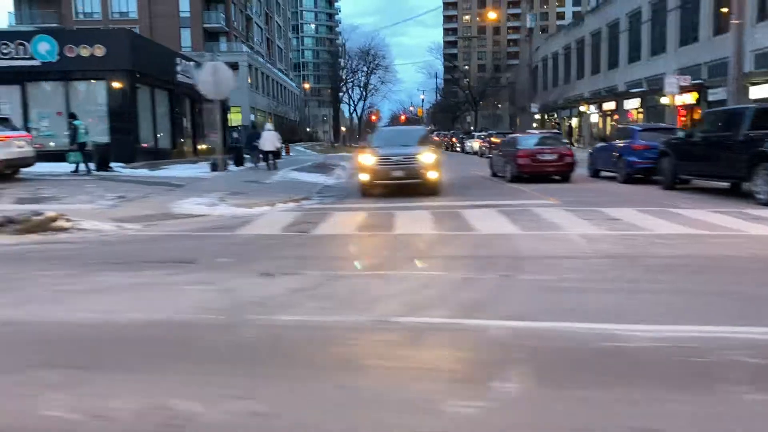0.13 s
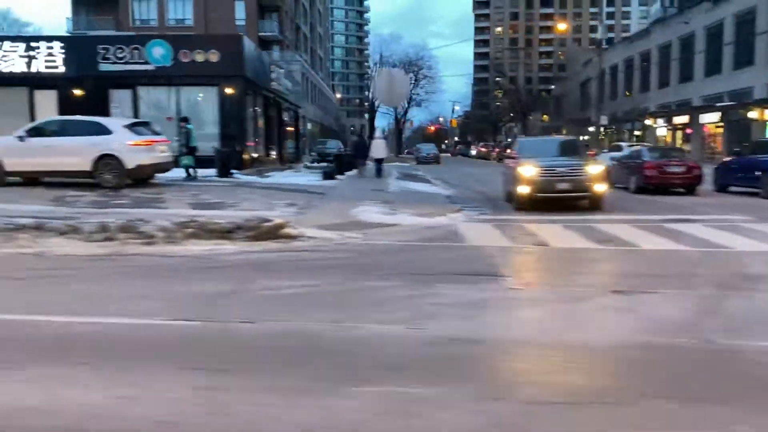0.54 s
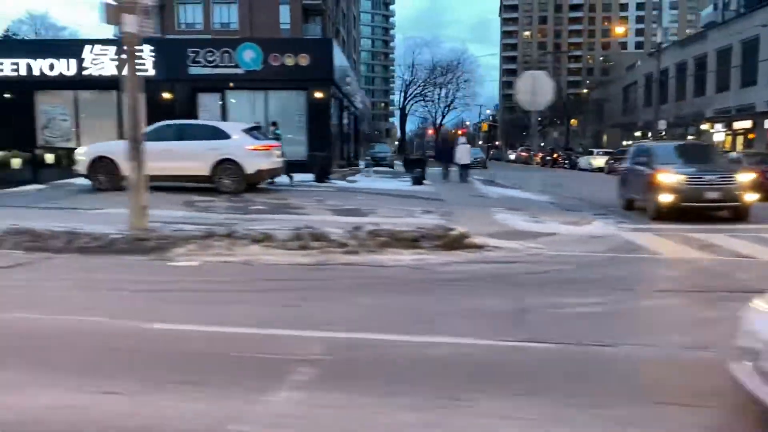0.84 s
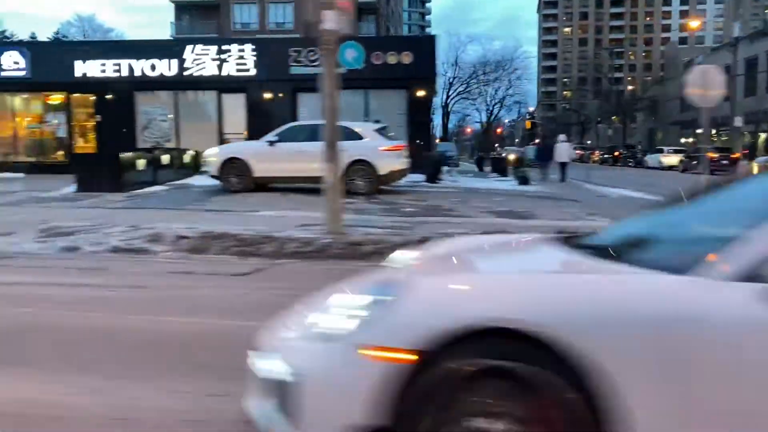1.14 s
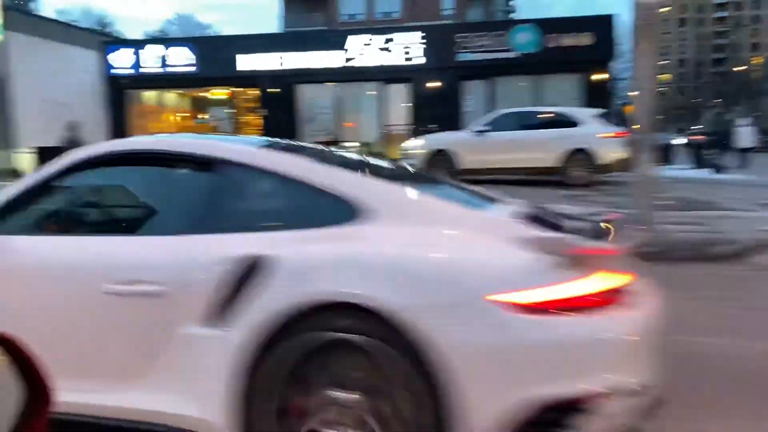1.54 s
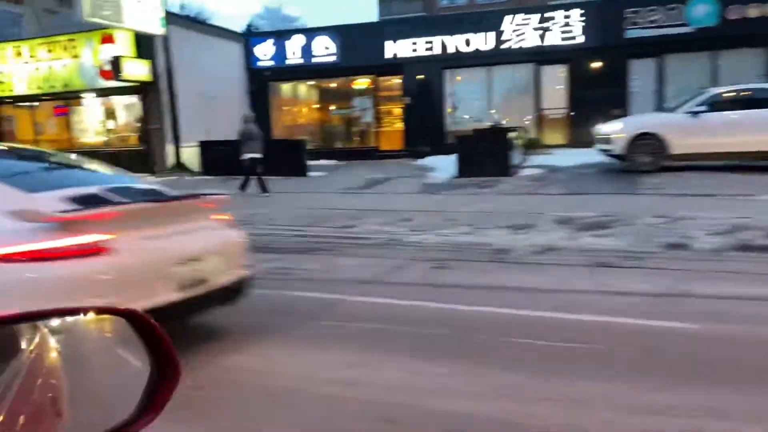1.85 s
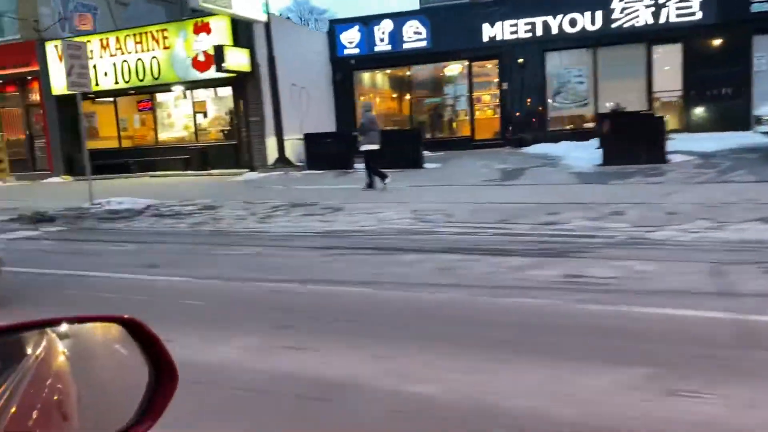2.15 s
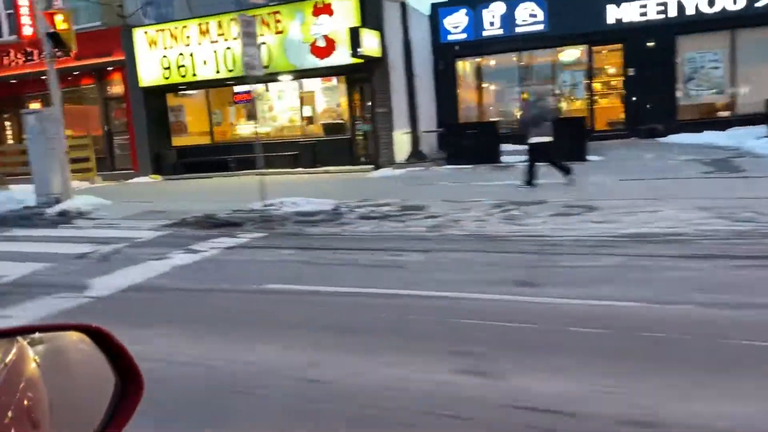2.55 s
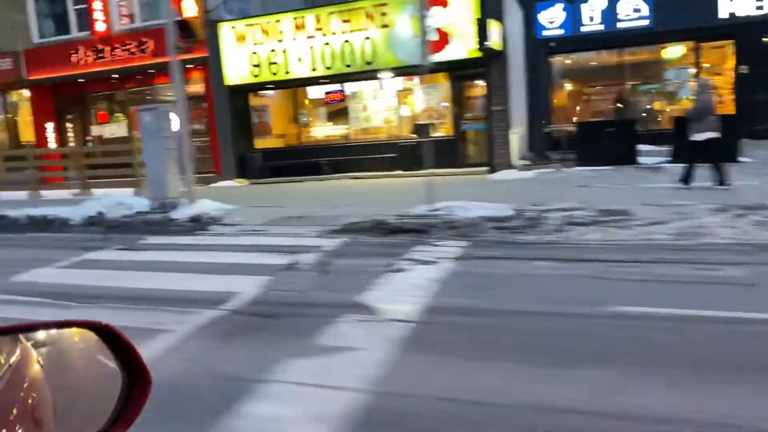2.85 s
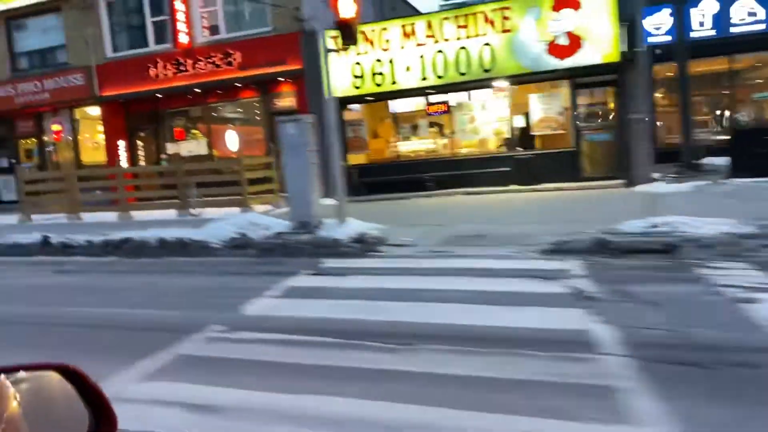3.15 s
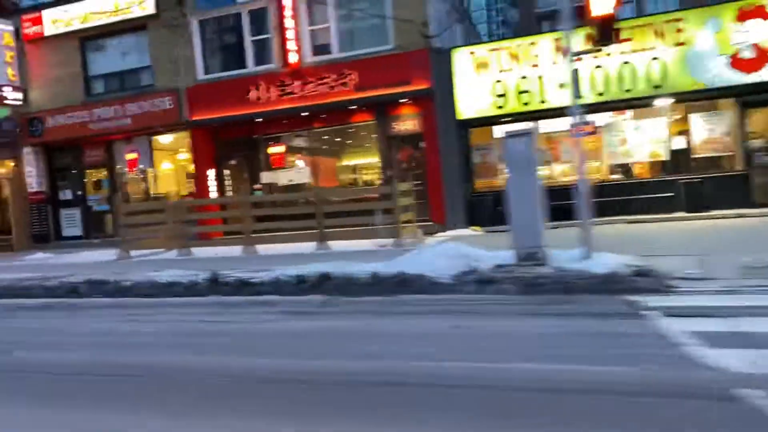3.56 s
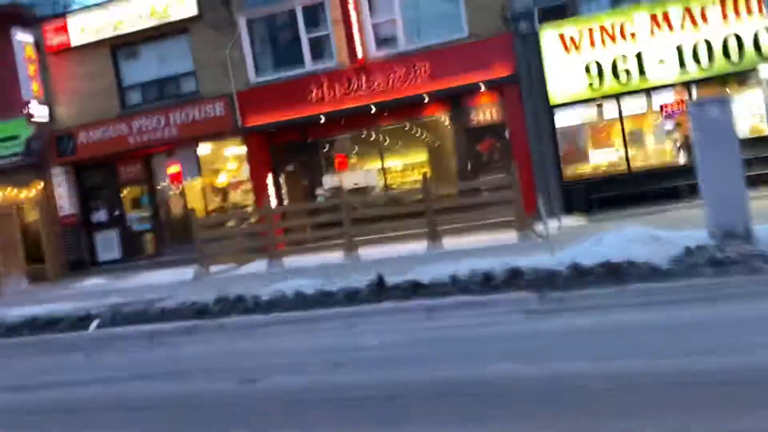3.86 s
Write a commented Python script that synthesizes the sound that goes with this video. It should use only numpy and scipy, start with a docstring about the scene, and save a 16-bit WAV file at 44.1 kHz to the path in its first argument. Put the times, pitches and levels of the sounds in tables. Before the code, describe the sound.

A turbocharged sports car engine, close and slightly left, starts abruptly at 0.07 s and climbs in a loud, raspy drone, with cracks near 0.2 and 0.75 s and growing intake hiss. At 1.45 s the throttle shuts and revs drop quickly. A very high, airy turbo whistle flutters downward in rapid chirps until about 3.6 s, over venting hiss, burbles until 2.4 s, quiet road rumble and dull knocks at 1.6 and 3.9 s.

```python
"""The exhaust of a turbocharged six-cylinder sports car, close by, drones in harmonics of the firing rate.
Noise pulsed by the firings adds rasp and intake hiss as the car pulls; then the throttle shuts and revs drop.
The turbo vents in a falling whistle, chopped into chirps at the firing rate, with hiss from the open valve.
Damped resonances make the exhaust burbles and a few bumps; coloured noise makes cracks and road rumble."""
import sys
import numpy as np
from scipy import signal
from scipy.fft import rfft, irfft
from scipy.io import wavfile

SR = 44100
rng = np.random.default_rng(int(sys.argv[2]) if len(sys.argv) > 2 else 0)


def master_out(mix):
    """Clip the mix to full scale and print it as 16-bit PCM to the path in sys.argv[1]."""
    frames = np.transpose(np.atleast_2d(mix))
    ceiling = np.clip(frames, -1, 1)
    pcm = np.round(ceiling * 32767).astype(np.int16)
    wavfile.write(sys.argv[1], SR, pcm)


N = 176400
T = np.arange(N) / SR  # time in s
HZ = np.fft.rfftfreq(N, 1 / SR)

# Levels are source levels, ahead of the duct, the left-right balance and the ceiling.
# Engine speed: time_s, firing_rate_hz
FIRING_RATE = [(.07, 70), (.15, 69.56), (.44, 76.58), (.77, 85.66), (1.13, 94.13), (1.25, 98.1),
               (1.33, 96.5), (1.44, 96.7), (1.49, 80.42), (1.53, 73.54), (1.6, 66.57), (1.72, 65.12),
               (2.45, 62.72), (4, 60.94)]
# Firing harmonics, throttle open: time_s, harmonic_1_db, harmonic_2_db, harmonic_3_db, harmonic_4_db
OPEN_HARMONICS = [(.08, -19.5, -26.5, -17, -19), (.16, -29.5, -30, -16.5, -12.5),
                  (.32, -20, -24.5, -16, -17.5), (.48, -19, -28, -21.5, -22.5),
                  (.62, -14.5, -23.5, -13, -41), (.77, -13, -15, -12, -14), (.95, -17, -21.5, -9, -30.5),
                  (1.1, -14.5, -20.5, -9.5, -24.5), (1.24, -10, -22, -11.5, -16.5),
                  (1.44, -15, -29.5, -13.5, -21.5)]
# Firing harmonics, throttle shut: time_s, harmonic_1_db, harmonic_2_db, harmonic_3_db, harmonic_4_db
SHUT_HARMONICS = [(1.46, -22.5, -40, -24.5, -52), (1.55, -26.5, -48, -24, -35),
                  (1.585, -21.5, -33, -28, -29), (1.615, -49, -24.5, -16.5, -20),
                  (1.78, -35.5, -31.5, -29.5, -37.5), (2.1, -34.5, -31, -40, -49),
                  (2.4, -28.5, -25.5, -41.5, -35), (2.9, -33.5, -35.5, -40, -49),
                  (3.2, -37, -35, -50, -45.5), (3.65, -30.5, -32, -45, -45.5), (4, -33.5, -37.5, -36, -51)]
# Common gain of the upper harmonics and uneven orders: time_s, gain_db
UPPER_GAIN = [(.07, -38.5), (.45, -38.5), (.8, -26), (1.05, -25.5), (1.25, -22.5), (1.44, -26.5),
              (1.5, -44), (1.58, -35), (1.63, -26), (1.85, -47.5), (2.1, -59), (2.4, -32), (2.9, -51.5),
              (4, -45)]
# Pipe colour of harmonics 5 to 13: frequency_hz, relative_level_db
PIPE_COLOUR = [(330, -10.5), (395, 2), (440, -3), (485, 2), (560, -3), (610, -5), (670, -8), (780, -13),
               (1300, -28)]
# Colour of the uneven orders: frequency_hz, relative_level_db
UNEVEN_COLOUR = [(65, -11.5), (130, -23), (260, 0), (400, -16), (560, -5), (850, -11.5), (1200, -21),
                 (1700, -23), (2500, -10)]
# Exhaust rasp: time_s, level_db
RASP_LEVELS = [(.07, -19), (.15, -21), (.35, -23.5), (.55, -19), (.78, -17), (.95, -26), (1.1, -39.5),
               (1.3, -33), (1.44, -23.5)]
# Exhaust rasp: frequency_hz, relative_density_db_per_hz
RASP_SPECTRUM = [(12, -31), (30, -4.5), (55, 3), (110, -11), (170, -10.5), (290, 3), (450, -10.5),
                 (750, -5), (1100, -10.5), (1500, -19), (2100, -24), (2900, -36.5), (6000, -47),
                 (16000, -47.5)]
# Intake hiss: time_s, level_db
HISS_LEVELS = [(.07, -43), (.3, -45), (.55, -43), (.78, -31.5), (1, -38.5), (1.13, -33), (1.27, -27.5),
               (1.44, -28.5)]
# Intake hiss: frequency_hz, relative_density_db_per_hz
HISS_SPECTRUM = [(500, -11), (1500, 10), (2800, 2.5), (4200, -0.5), (8000, -5.5), (15500, -5)]
# Intake resonance at full boost: time_s, level_db
HOWL_LEVELS = [(1.15, -58), (1.3, -28), (1.44, -33.5)]
# Sharp exhaust cracks: start_s, level_db
CRACK_EVENTS = [(.173, -29), (0.728, -20), (0.788, -19), (1.604, -26.5)]
# Wheel rumble: time_s, level_db
RUMBLE_LEVELS = [(.07, -14.5), (.7, -29.5), (1.1, -35), (1.6, -27.5), (2.1, -31), (2.3, -30), (2.85, -36),
                 (2.97, -27.5), (3.18, -34.5), (3.33, -25.5), (3.45, -32), (3.7, -28), (3.8, -44),
                 (3.88, -22), (4, -44)]
# Drumming car body: time_s, level_db
BODY_LEVELS = [(.07, -26), (1.5, -47), (1.76, -31.5), (1.86, -28), (2.16, -30), (2.33, -23.5),
               (2.62, -27.5), (2.9, -41), (3.2, -35.5), (3.44, -39), (3.65, -35), (3.82, -40),
               (3.92, -35.5), (4, -33.5)]
# Tyre roar: time_s, level_db
ROAR_LEVELS = [(.07, -37), (1.6, -37.5), (2.1, -46.5), (2.35, -42), (2.85, -47), (3.25, -46), (3.6, -43),
               (4, -45)]
# Wheel rumble: frequency_hz, relative_density_db_per_hz
RUMBLE_SPECTRUM = [(15, -32), (28, -16), (48, 3), (70, 0), (110, 0.5), (200, -16.5), (600, -56.5)]
# Drumming car body: frequency_hz, relative_density_db_per_hz
BODY_SPECTRUM = [(50, -18), (120, -3), (230, 1), (310, -1), (410, -1), (470, -12.5), (620, -10.5),
                 (800, -19), (1300, -39), (4000, -57)]
# Tyre roar: frequency_hz, relative_density_db_per_hz
ROAR_SPECTRUM = [(200, -14), (600, 4), (1000, 5), (1400, -3), (2100, -4), (3000, -15), (5000, -21),
                 (12000, -24)]
# Turbo whistle: time_s, pitch_hz, level_db
WHISTLE_GLIDE = [(1.46, 12470, -44), (1.52, 11950, -30.5), (1.585, 11720, -31.5), (1.62, 11000, -38),
                 (1.75, 9435, -39), (1.96, 7310, -46.5), (2.08, 6885, -59), (2.3, 5690, -47.5),
                 (2.45, 5300, -53), (2.68, 4420, -60), (2.78, 4143, -55), (2.9, 3840, -47),
                 (2.98, 3756, -53), (3.09, 3660, -43.5), (3.17, 3450, -49), (3.26, 3320, -49),
                 (3.36, 3270, -61.5), (3.5, 3100, -52), (3.75, 2807, -76)]
# Air through the open valve: time_s, level_db
VENT_LEVELS = [(1.45, -40.5), (1.6, -39.5), (1.92, -43.5), (2.08, -53), (2.3, -49.5), (2.675, -50.5),
               (2.7, -56), (3.2, -77), (4, -72)]
# Air through the open valve: frequency_hz, relative_density_db_per_hz
VENT_SPECTRUM = [(800, -57), (1400, -9), (2200, 7), (2900, -2.5), (4300, 0.5), (7000, 0), (15500, -1)]
# Soft band of hiss while the valve leaks: time_s, level_db
RING_LEVELS = [(1.7, -80), (1.92, -52.5), (2.1, -65), (2.67, -51), (2.7, -61), (3, -55), (3.6, -88)]
# Intake duct resonances that the whistle sweeps through: centre_hz, half_width_hz, gain_db
DUCT_PEAKS = [(3356, 95, 9), (3710, 140, 7.5), (4290, 160, 6.5), (5000, 190, 7.5), (5654, 190, 5),
              (6900, 320, 3)]
# Transmission along the intake duct: frequency_hz, gain_db
DUCT_GAIN = [(2800, -4.5), (3400, -6), (5500, -5.5), (8000, -0.5), (11000, -2)]
# Knocks through the body: start_s, level_db, pitch_hz
BUMP_EVENTS = [(1.605, -13.5, 310), (3.896, -14.5, 395), (3.904, -15.5, 248), (3.943, -18, 422)]
# Exhaust burbles with the throttle shut: start_s, level_db
BURBLE_EVENTS = [(1.787, -21.5), (1.832, -16.5), (1.925, -22), (1.993, -23.5), (2.19, -19.5),
                 (2.405, -18.5)]
# Silencer modes: pitch_hz, relative_level_db, t60_s
SILENCER_MODES = [(131.9, -9, .08), (254.6, 1, 0.098), (366.7, -0.5, 0.091), (402.4, -2, .1),
                  (603.5, -13.5, 0.063)]
# Left-right likeness of engine and vent noise: frequency_hz, coherence
ENGINE_COHERENCE = [(60, .99), (280, 0.5), (640, 0.6), (1400, 0.45), (3100, 0.8), (6800, 0.5),
                    (15000, -0.5)]
# Left-right likeness of road noise: frequency_hz, coherence
ROAD_COHERENCE = [(130, 0.95), (290, 0.76), (640, -0.053), (1400, -0.29), (3100, 0.71), (15000, 0.25)]
# Balance of exhaust and intake: frequency_hz, left_minus_right_db
ENGINE_BALANCE = [(60, 0), (110, 3), (200, 2.5), (380, 5), (700, 1.5), (2380, 4), (4400, 3), (8120, 0.5)]
# Balance of whistle, road, burbles and bumps: frequency_hz, left_minus_right_db
ROAD_BALANCE = [(60, .5), (380, 0.44), (700, 5.7), (1300, 1.5), (4400, 3.4), (8000, .5)]
# Microphone notches: centre_hz, half_width_hz, gain_db
NOTCHES = [(9030, 580, -30), (13100, 570, -27)]

START_S = .072
LIFT_S, SHUT_S = 1.445, 0.0034  # the throttle begins to shut, and its closing time
UNEVEN_DB = -9  # uneven orders relative to the upper harmonics
OVERRUN_DULL_HZ = 418  # throttle shut: the upper harmonics fall away above this
HOWL_HZ, HOWL_WIDTH_HZ = 1700, 533
CRACK_T60_S, CRACK_HZ, CRACK_WIDTH_HZ = 0.091, 800, 1200
WHISTLE_WIDTH = .11  # sets the bandwidth of the airy whistle in proportion to its pitch
CHIRP_SETTLE = .26  # share of a firing over which each chirp levels out
CHIRP_SAG = 0.41  # relative pitch fall per firing at the middle of a chirp
CHIRP_SCATTER, CHIRP_SPREAD_DB = .015, 1.2  # pitch (relative) and strength vary from firing to firing
AIRY = .52  # noisy share at 4 kHz
SPIT_S, SPIT_LENGTH_S, SPIT_DB, SPIT_HZ, SPIT_WIDTH_HZ = 1.585, 0.0042, -23.5, 11400, 2100
PORT_DELAY_US = 20  # the whistle reaches the two microphones this far apart
RING_HZ, RING_WIDTH_HZ = 3640, 510
BUMP_RISE_S, BUMP_T60_S = 0.0014, 0.036
BURBLE_RISE_S = 0.0026
EDGE_HZ = 15900  # upper band limit


def amp(db):
    """Level law: decibels to amplitude ratio."""
    return 10 ** (np.asarray(db) / 20)


def unit(x):
    """Power normalisation to rms 1."""
    return x / np.sqrt(np.mean(abs(x) ** 2) + 1e-20)


def curve(rows):
    """Linear interpolation in time of every column after the first."""
    times, *columns = np.transpose(rows)
    return np.squeeze([np.interp(T, times, column) for column in columns])


def read(points, hz):
    """Interpolation of a spectrum on a logarithmic frequency axis."""
    f, value = np.transpose(points)
    return np.interp(np.log(hz + 1), np.log(f + 1), value)


def wander(rate_hz):
    """Low-pass random fluctuation of about rms 1."""
    step = 64  # samples between knots
    z = rng.standard_normal(3072)
    knot_hz = np.fft.rfftfreq(len(z), step / SR)
    slow = irfft(rfft(z) * np.exp(-(knot_hz / rate_hz) ** 2))
    return np.interp(np.arange(N), np.arange(len(z)) * step, unit(slow))


def bells(rows):
    """Resonance gains: Gaussian peaks or notches, summed in decibels."""
    return amp(sum(db * np.exp(-((HZ - hz) / width) ** 2) for hz, width, db in rows))


def air_band(hz, width_hz):
    """Turbulence through one resonance: noise in a Gaussian band, rms 1."""
    band = np.exp(-((HZ - hz) / width_hz) ** 2)
    return unit(irfft(rfft(rng.standard_normal(N)) * band, N))


def noise(spectrum, likeness):
    """Partial coherence: coloured noise at two microphones from a shared and a separate source."""
    shared, separate = rfft(rng.standard_normal((2, N)))
    coherence = np.clip(read(likeness, HZ), -1, 1)
    other = coherence * shared + np.sqrt(1 - coherence ** 2) * separate
    return unit(irfft(np.array([shared, other]) * amp(read(spectrum, HZ)), N))


def lean(x, balance):
    """Interchannel level difference, shared equally between left and right in each band."""
    return irfft(rfft(x) * amp(np.outer([.5, -.5], read(balance, HZ))), N)


def throttle():
    """Flow gating: 1 while the throttle is open, falling smoothly to 0 as it shuts."""
    return np.exp(-(np.maximum(T - LIFT_S, 0) / SHUT_S) ** 2)


def puffs(turns, width, between, spread_db):
    """Pulsating flow: one puff of random strength per firing over a steady leak; width in firings."""
    strength = amp(spread_db * rng.standard_normal(N))[turns.astype(int)]
    pulse = np.exp(-((turns % 1 - .5) / width) ** 2)
    return unit(abs(between) + strength * pulse)


def partial(turns, flutter):
    """Quadrature modulation: one engine order whose height and phase flutter."""
    angle = (2 * np.pi * (turns + rng.random())).astype(np.float32)
    in_phase = (1 + flutter * wander(rate_hz=20.5)) * np.cos(angle)
    quadrature = flutter * wander(rate_hz=44) * np.sin(angle)
    return np.sqrt(2) * (in_phase + quadrature)


def exhaust(turns):
    """Harmonic series: four strong firing harmonics, pipe-coloured upper ones, orders of uneven cylinders."""
    rate, gas_on = curve(FIRING_RATE), throttle()
    low = gas_on * amp(curve(OPEN_HARMONICS)) + (1 - gas_on) * amp(curve(SHUT_HARMONICS))
    open_flutter = np.interp(rate, [72, 88], [.22, .05])
    shut_flutter = np.interp(rate, [63, 66], [.38, .14])
    flutter = gas_on * open_flutter + (1 - gas_on) * shut_flutter
    drone = sum(gain * partial(k * turns, flutter) for k, gain in enumerate(low, 1))

    upper = np.zeros(N)
    for k in range(5, 14):
        dull = (1 - gas_on) * (k * rate / OVERRUN_DULL_HZ) ** 16
        gain = amp(read(PIPE_COLOUR, k * rate) + 2.8 * wander(rate_hz=7.7))
        upper += gain * partial(k * turns, flutter=0.29) / np.sqrt(1 + dull)

    # crank orders at thirds between the harmonics, then whole harmonics 14 to 21
    orders = [k / 3 for k in range(1, 42) if k % 3] + list(range(14, 22))
    uneven = np.zeros(N)
    for k in orders:
        gain = amp(read(UNEVEN_COLOUR, k * rate) + 3.0 * wander(rate_hz=7.6))
        uneven += gain * partial(k * turns, flutter=0.23)
    return drone + amp(curve(UPPER_GAIN)) * (upper + amp(UNEVEN_DB) * gas_on * uneven)


def rasp_and_hiss(turns):
    """Modulated turbulence: exhaust rasp and intake hiss pulse with the firings until the throttle shuts."""
    rasp = amp(curve(RASP_LEVELS)) * noise(RASP_SPECTRUM, ENGINE_COHERENCE)
    rasp = rasp * puffs(turns, width=0.28, between=1.0, spread_db=2)
    hiss = amp(curve(HISS_LEVELS)) * noise(HISS_SPECTRUM, ENGINE_COHERENCE)
    howl = amp(curve(HOWL_LEVELS)) * air_band(HOWL_HZ, HOWL_WIDTH_HZ)
    intake = (hiss + howl) * puffs(turns, width=0.019, between=5.3, spread_db=9)
    return throttle() * (rasp + intake)


def road():
    """Broadband excitation: wheels rumble, the body drums over rough asphalt and the tyres roar."""
    rumble = amp(curve(RUMBLE_LEVELS)) * noise(RUMBLE_SPECTRUM, ROAD_COHERENCE)
    rough = wander(rate_hz=24)  # moves body and tyre levels together
    body = amp(curve(BODY_LEVELS) + 1.4 * rough) * noise(BODY_SPECTRUM, ROAD_COHERENCE)
    roar = amp(curve(ROAR_LEVELS) + 0.99 * rough) * noise(ROAR_SPECTRUM, ROAD_COHERENCE)
    return rumble + body + roar


def cracks():
    """Exponential decay: each exhaust crack is a sudden burst of band noise that dies away."""
    bursts = np.zeros(N)
    for start_s, level_db in CRACK_EVENTS:
        age = np.maximum(T - start_s, 0)
        bursts += (T > start_s) * amp(level_db - 60 * age / CRACK_T60_S)
    return bursts * air_band(CRACK_HZ, CRACK_WIDTH_HZ)


def whistle(turns):
    """Frequency modulation: the slowing turbo gives one falling chirp a firing, airiest at high pitch."""
    pitch, level_db = curve(WHISTLE_GLIDE)
    # within each firing the pitch holds, falls and levels out
    phase = np.maximum(turns % 1 - .5, -CHIRP_SETTLE)
    hook = CHIRP_SETTLE * np.expm1(-phase / CHIRP_SETTLE)
    chirp = 1 + CHIRP_SAG * hook + CHIRP_SCATTER * rng.standard_normal(N)[turns.astype(int)]
    clear = np.exp(2j * np.pi * np.cumsum(pitch * chirp) / SR)

    # airy part: a carrier times random knots that pass at a rate proportional to pitch
    knots = np.arange(N // 10)
    position = np.cumsum(pitch) / SR * 2 * WHISTLE_WIDTH
    blur = [np.interp(position, knots, v) for v in rng.standard_normal((2, len(knots)))]
    rush = unit(blur[0] + 1j * blur[1]) * np.exp(2j * np.pi * np.cumsum(pitch) / SR)

    airy = np.clip(AIRY * (pitch / 4000) ** 1.6, 0, .9)
    chirps = np.sqrt(1 - airy ** 2) * clear
    chirps = chirps * puffs(turns, width=0.15, between=0, spread_db=CHIRP_SPREAD_DB)
    breath = airy * rush * puffs(turns, width=0.066, between=1.0, spread_db=CHIRP_SPREAD_DB)
    # the valve spits once
    spit = amp(SPIT_DB) * np.exp(-((T - SPIT_S) / SPIT_LENGTH_S) ** 2)
    spit = spit * unit(signal.hilbert(air_band(SPIT_HZ, SPIT_WIDTH_HZ)))
    tone = amp(level_db) * (chirps + breath) + spit
    lead = pitch * PORT_DELAY_US / 10 ** 6  # phase lead of the right side, in cycles
    return np.sqrt(2) * np.array([tone, tone * np.exp(2j * np.pi * lead)]).real


def blow_off(turns):
    """Duct filtering: whistle and valve hiss start as the throttle shuts and pass the resonant intake duct."""
    vent = amp(curve(VENT_LEVELS)) * noise(VENT_SPECTRUM, ENGINE_COHERENCE)
    ring = amp(curve(RING_LEVELS)) * air_band(RING_HZ, RING_WIDTH_HZ)
    released = (1 - throttle()) * (whistle(turns) + vent + ring)
    return irfft(rfft(released) * bells(DUCT_PEAKS) * amp(read(DUCT_GAIN, HZ)), N)


def bumps():
    """Damped oscillation: each short dull knock is one decaying sine."""
    out = np.zeros(N)
    for start_s, level_db, pitch_hz in BUMP_EVENTS:
        age = np.maximum(T - start_s, 0)
        envelope = np.minimum(age / BUMP_RISE_S, 1) * amp(level_db - 60 * age / BUMP_T60_S)
        out += envelope * np.sin(2 * np.pi * pitch_hz * age)
    return out


def burbles():
    """Modal response: late-burning fuel thumps the silencer, whose modes ring a little differently each time."""
    out, t = np.zeros(N), T[:SR // 4]
    for start_s, level_db in BURBLE_EVENTS:
        ring = np.zeros(len(t))
        for pitch_hz, mode_db, t60_s in SILENCER_MODES:
            shifted_hz = pitch_hz * (1 + 0.033 * rng.standard_normal())
            ring += amp(mode_db - 60 * t / t60_s) * np.sin(2 * np.pi * shifted_hz * t)
        rise = np.minimum(t / BURBLE_RISE_S, 1)
        out[round(start_s * SR):][:len(t)] += amp(level_db) * rise * ring
    return out


def scene():
    """Superposition: one firing rate drives exhaust, intake and whistle; all leans a little to the left."""
    unsteady_rate = curve(FIRING_RATE) * (1 + 0.0013 * wander(rate_hz=17.1))
    turns = np.cumsum(unsteady_rate) / SR  # firings so far
    engine = exhaust(turns) + rasp_and_hiss(turns) + cracks()
    others = road() + blow_off(turns) + bumps() + burbles()
    return lean(engine, ENGINE_BALANCE) + lean(others, ROAD_BALANCE)


def record(dry):
    """Saturation and filtering: rounded peaks, two microphone notches, an abrupt start and a band limit."""
    ceiling = 0.88
    held = dry / (1 + (dry / ceiling) ** 8) ** (1 / 8)
    notched = irfft(rfft(held) * bells(NOTCHES), N)
    heard = notched * np.where(T > START_S, 1, amp(-74))
    low_pass = signal.firwin(511, EDGE_HZ, window=("kaiser", 9), fs=SR)
    return signal.oaconvolve(heard, low_pass[None], "same")


dry = scene()
out = record(dry)
master_out(out)
```